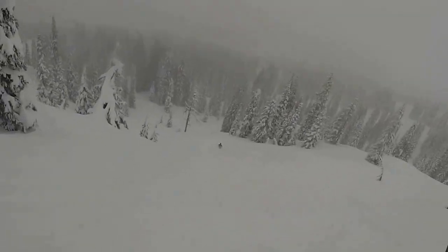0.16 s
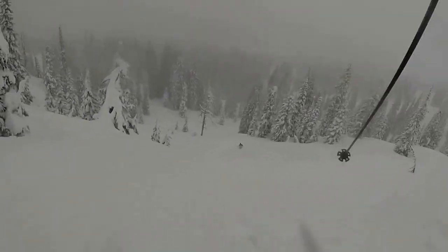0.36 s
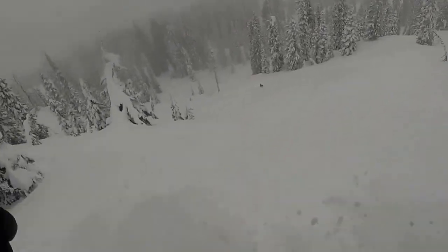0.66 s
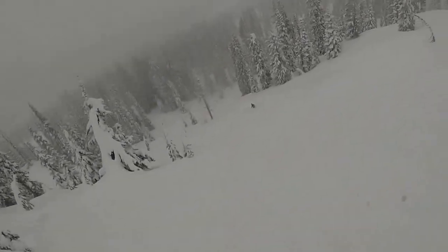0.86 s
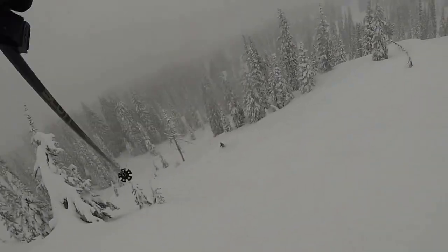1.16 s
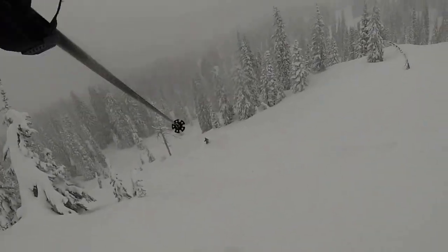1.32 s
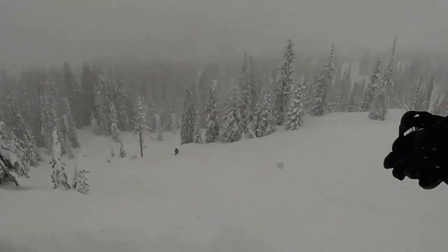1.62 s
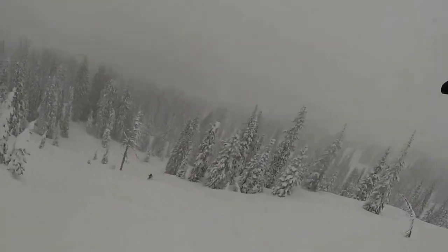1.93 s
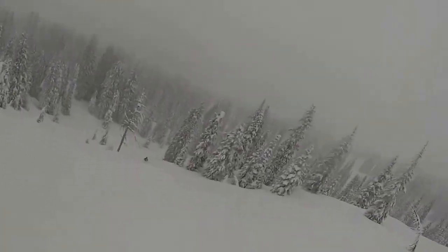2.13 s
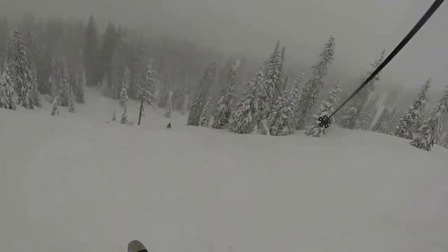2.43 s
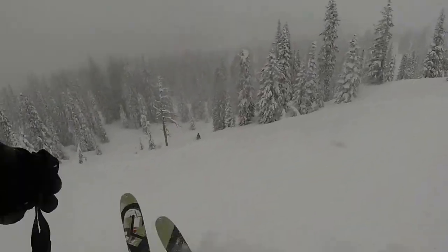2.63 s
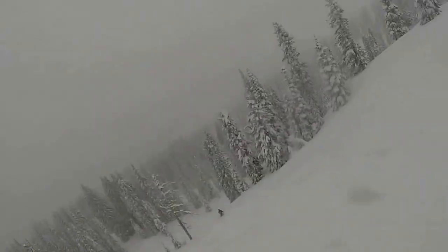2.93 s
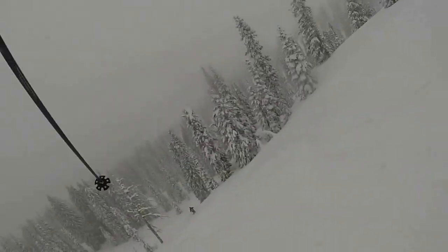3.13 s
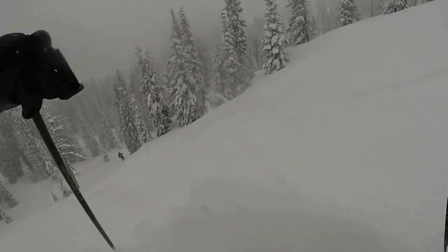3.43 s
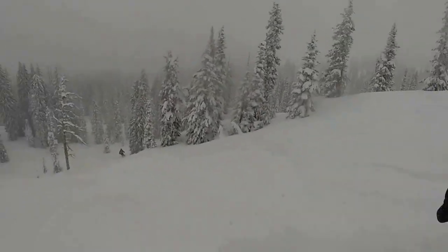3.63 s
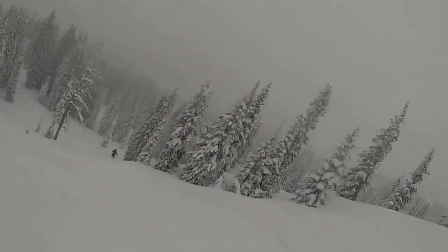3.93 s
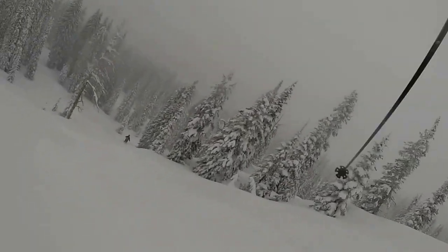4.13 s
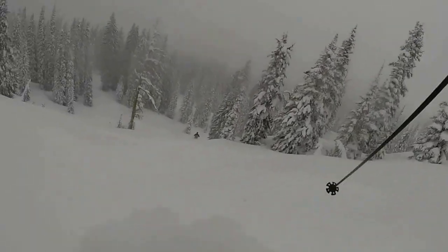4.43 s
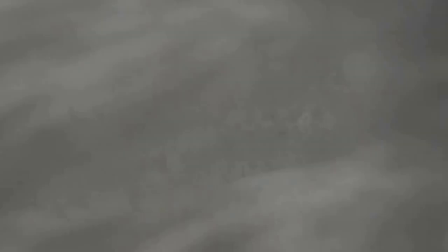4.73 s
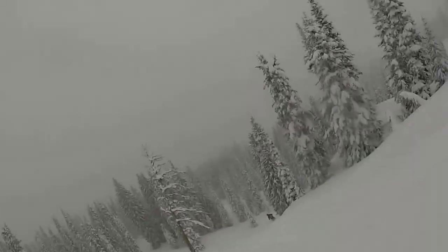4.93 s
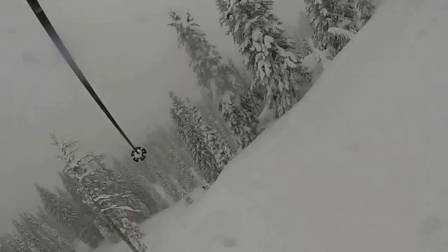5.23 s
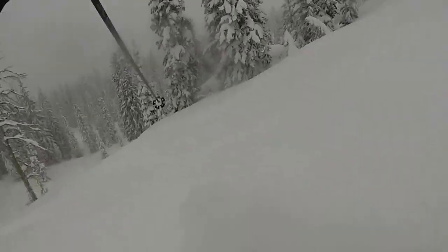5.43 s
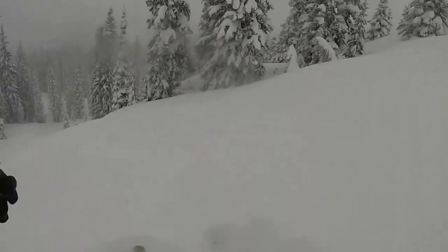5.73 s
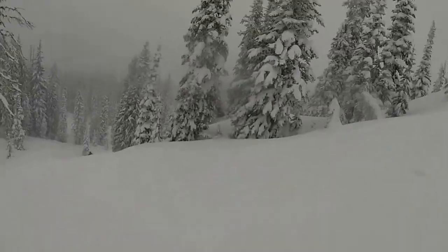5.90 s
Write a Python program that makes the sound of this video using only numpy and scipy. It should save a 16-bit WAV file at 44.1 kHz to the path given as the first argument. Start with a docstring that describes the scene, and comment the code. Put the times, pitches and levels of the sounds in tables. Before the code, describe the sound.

Skis swish through deep powder in linked turns, with wind buffeting, sharp knocks and snow ticking on a body-worn camera.

```python
"""Skis carve linked turns through deep powder, heard from a small action camera worn on the body.
As the load builds through each turn they shear the snow, rumble over it, thud on lumps and crunch it down.
Bursts and clouds of spray hiss across the camera, crumbs tick on its case and soft slabs slap it.
The loose mount knocks against its stop once a turn, snow and clothing scuff, and air buffets the mic."""
import sys
import numpy as np
from scipy import signal
from scipy.fft import rfft, irfft
from scipy.io import wavfile
from scipy.ndimage import uniform_filter1d

SR = 44100
rng = np.random.default_rng(int(sys.argv[2]) if len(sys.argv) > 2 else 0)


def wrap_up_sound(samples):
    """Save the sound to the file named by the first command line argument, as 16-bit audio."""
    columns = np.atleast_2d(samples).T
    # keep every value between -1 and 1, then stretch to whole-number steps
    tamed = np.clip(columns, -1, 1)
    steps = np.round(tamed * 32767).astype(np.int16)
    wavfile.write(sys.argv[1], SR, steps)


N = 267246
TIME = np.arange(N) / SR

# tone of the ski swish, the spray, the ski rumble and the wind, each (frequency [Hz], level [dB])
SWISH_EQ = [(350, -6), (560, -4.5), (800, -5.5), (1300, -4.5), (1700, 3), (2100, -1.5), (2800, -1),
            (3300, -0.5), (4200, -12.5), (5800, -9), (7200, -19), (12000, -56)]
SPRAY_EQ = [(700, -21.5), (1700, -3), (3000, -1), (4200, 1.5), (5400, -2.5), (6400, -3), (7500, -9),
            (8600, -5), (11000, -8), (15000, -14), (16000, -50)]
RUMBLE_EQ = [(56, -40.5), (95, -2), (173, 3.5), (232, -7), (284, -8.5), (414, -10), (586, -19.5),
             (719, -26.5), (800, -26), (1040, -24), (1760, -120)]
WIND_EQ = [(5, -24.5), (12, 1), (24, -9), (36, 4), (50, -27), (75, -13.5), (110, -24), (160, -41.5),
           (300, -89)]
# turns: (end [s], knock peak [dB], swish [dB], spray [dB], rumble [dB], wind [dB], bite [exponent],
# unweighting [s], trim of the float before it [dB]); swish to wind at full load; bite under 1 grips early
TURNS = [(0.0765, 2, -44, -54.5, -32.5, -31, 0.5, 0.017, -4),
         (1.3627, 4.4, -48.5, -62, -40.5, -40, 0.36, 0.097, -7.5),
         (2.3426, 3, -44, -57.5, -37, -36, 0.64, .17, 1.5),
         (3.2716, 1.6, -45, -71.5, -39.5, -29.5, 0.38, 0.031, -5),
         (4.2684, 2, -49, -61, -41, -37, 1, 0.057, -0.5),
         (5.2748, 2, -42.5, -51.5, -36, -37.5, 0.55, 0.15, 0.5),
         (6.0465, 0.96, -49, -65, -39, -38, 0.58, .1, 3)]
# the skis float unweighted between turns: (swish [dB], spray [dB], rumble [dB], wind [dB])
FLOAT_LEVELS = [-53, -71, -55, -45.5]
# sizzle on the spray near 5.5 kHz: (time [s], gain of that band [dB])
SIZZLE_GAIN = [(0, -28), (3.6, -5), (3.9, 8), (4.6, 1), (5.5, -5), (6.06, -10)]
# lumps under the skis: (time [s], level [dB], pitch [Hz], t60 [s])
LUMPS = [(0.012, -20, 174, 0.092), (0.616, -28, 424, 0.032), (2.221, -22, 420, 0.028),
         (2.854, -14, 330, 0.012), (2.963, -11.5, 206, 0.034), (2.99, -15.5, 333, 0.026),
         (3.73, -17.5, 188, 0.043), (3.819, -27, 342, 0.08), (3.952, -25, 362, 0.021),
         (4.953, -14, 424, 0.017), (5.514, -24, 400, 0.039), (5.826, -19, 235, 0.012),
         (5.996, -18.5, 423, 0.013)]
# ring of the camera case: (frequency [Hz], level [dB], t60 [s])
CASE_MODES = [(1860, -17.5, 0.03), (2860, 6, 0.0022), (3420, 1.5, 0.006), (4360, 4.5, 0.004),
              (5075, 8.5, 0.005), (5950, 3.5, 0.004), (7840, 16.5, 0.001), (9350, -5.5, 0.0025),
              (13200, 3.5, 0.0043)]
# hard bits strike the case: (time [s], peak [dB], centre [Hz])
CASE_HITS = [(0.024, -17, 3740), (0.1051, -25, 4230), (0.3755, -26.5, 3730), (0.533, -22, 4160),
             (0.5493, -23, 5140), (0.674, -19.5, 4750), (0.698, -20, 4800), (0.7458, -16.5, 3020),
             (0.767, -18.5, 4700), (0.889, -16.5, 6600), (0.9538, -20.5, 3730), (0.991, -24, 6800),
             (1.151, -24, 4370), (1.183, -16.5, 3430), (1.2706, -22, 5000), (1.2909, -17, 4460),
             (1.3463, -11.5, 4500), (1.501, -20, 3750), (1.555, -23, 4630), (1.734, -18.5, 5560),
             (2.0393, -12.5, 5230), (2.101, -15, 4060), (2.199, -13.5, 4500), (2.5461, -18.5, 4500),
             (2.73, -22, 4540), (2.757, -14, 5340), (2.8534, -3, 3250), (2.854, -3, 2700),
             (2.861, -16.5, 3500), (2.975, 1.5, 5040), (3.078, -18, 5300), (3.1036, -17, 4600),
             (3.1954, -18.5, 5250), (3.58, -17.5, 4400), (3.6545, -17, 4500), (4.0103, -11, 3500),
             (4.342, -22.5, 5330), (4.4712, -23.5, 4700), (4.5785, -17, 4400), (4.662, -18.5, 4520),
             (4.705, -11, 3200), (4.7218, -5.5, 4300), (5.1795, -18, 5100), (5.2385, -12, 4870),
             (5.474, -19, 4700), (5.6042, -16, 2400)]
# loose crumbs pepper the case: (time [s], peak of the softest [dB])
CRUMB_LEVELS = [(0.15, -44), (0.8, -33.5), (1.5, -38), (2.5, -39.5), (3.4, -43), (4.5, -32.5), (5.2, -47),
                (6.0, -34)]
# ring of mount and camera: (frequency [Hz], level [dB], t60 [s])
MOUNT_MODES = [(55.6, -19, 0.056), (163.5, -11, 0.022), (380, -16, 0.012), (612, -19.5, 0.017),
               (1430, -10.5, 0.0054), (1735, -22.5, 0.025), (2450, -8.5, 0.0065), (3670, -8.5, 0.0033),
               (6220, -15.5, 0.0055), (8800, -15, 0.0035), (12000, -6, 0.0046)]
# snow and clothing slip: (time [s], level [dB], centre [Hz], length [s])
SCUFFS = [(0.287, -48, 2200, 0.008), (0.577, -43, 2750, 0.031), (0.618, -38.5, 780, 0.011),
          (0.733, -41.5, 2470, 0.025), (0.909, -32, 2150, 0.0024), (1.077, -44, 2580, 0.0095),
          (1.189, -39, 2740, 0.0085), (1.213, -35.5, 1850, 0.005), (1.624, -37, 2750, 0.0034),
          (2.222, -38, 1510, 0.0063), (2.406, -37.5, 1640, 0.0093), (3.59, -40, 2570, 0.014),
          (3.728, -47, 900, 0.016), (4.445, -43.5, 920, 0.033), (4.729, -25.5, 1200, 0.0061),
          (5.357, -33.5, 2370, 0.005), (5.83, -31, 2070, 0.0032)]
# the skis press into firmer snow: (time [s], hold [s], rumble [dB], crunch [dB])
PRESSES = [(.6, 0.15, -45.5, -66), (1.79, 0.044, -42.5, -50.5), (2.32, 0.092, -47, -50),
           (2.965, 0.045, -29.5, -53), (3.21, 0.021, -35.5, -55), (3.78, 0.12, -47, -48),
           (4.44, 0.043, -49.5, -57), (4.79, 0.087, -34, -40), (5.02, .11, -33.5, -44),
           (5.5, 0.028, -42.5, -52), (5.97, 0.052, -39, -42)]
# gusts on the mic: (time [s], hold [s], level [dB])
GUSTS = [(.615, 0.16, -27), (1.13, .04, -33), (1.79, 0.056, -32.5), (2.43, .02, -32), (2.86, 0.045, -24.5),
         (3.87, .12, -30.5), (4.71, 0.18, -30), (5.95, 0.15, -28)]
# the skis plough soft snow and throw it at the camera: (time [s], hold [s], swish [dB], spray [dB])
BURSTS = [(1.89, 0.037, -38, -36), (2.91, 0.038, -32, -34.5), (3.64, 0.033, -44.5, -44),
          (4.725, 0.052, -29, -29), (4.81, 0.0067, -27.5, -27), (4.858, 0.0046, -34, -38),
          (4.93, 0.015, -34.5, -31.5)]
# fine powder drifts over the camera: (thickest at [s], swell [s], fade [s], spray [dB])
CLOUDS = [(1.999, 0.076, 0.083, -49.5), (2.189, 0.04, 0.092, -49), (3.131, 0.049, 0.077, -45),
          (3.8, 0.19, 0.12, -53.5), (4.08, .11, 0.12, -44.5), (5.199, 0.078, 0.045, -43.5),
          (5.382, 0.08, 0.11, -51), (5.719, 0.067, 0.051, -50)]
# slabs of powder slap the camera: (time [s], peak [dB], pitch [Hz])
SLABS = [(4.826, -17.5, 107), (4.9576, -2, 139)]


def undb(db):
    """Decibels to gain."""
    return 10 ** (np.asarray(db) / 20)


def db_sum(*levels):
    """Level of unrelated sounds heard together."""
    return 10 * np.log10(sum(undb(db) ** 2 for db in levels))


def automation(table):
    """A fader line through (time, value) points, one value per sample."""
    return np.interp(TIME, *np.transpose(table))


def add(track, s, sound):
    """Mix a sound into the track from time s."""
    i = int(s * SR)
    track[i:i + len(sound)] += sound[:N - i]


def walk(rate):
    """Smooth random motion with a spread of 1, quicker at a higher rate."""
    k = max(int(SR / rate), 2)
    x = uniform_filter1d(uniform_filter1d(rng.standard_normal(N), k), k)
    return x / x.std()


def colour(x, spectrum, unity_band_hz):
    """Minimum-phase EQ through (Hz, dB) points, with an rms gain of 1 from the given band alone."""
    f = np.arange(N // 2 + 1) * SR / N
    hz, db = np.transpose(spectrum)
    low, high = unity_band_hz
    gain = undb(np.interp(np.log(f + 1), np.log(hz), db))
    gain = gain / np.sqrt(np.mean(gain ** 2 * (f > low) * (f < high)))
    cepstrum = irfft(np.log(gain), N)
    fold = np.r_[1, np.full(N // 2 - 1, 2), np.zeros(N - N // 2)]
    return irfft(rfft(x) * np.exp(rfft(cepstrum * fold)), N)


def band(x, hz, width_hz):
    """Resonance of gain 1 at its centre."""
    return signal.lfilter(*signal.iirpeak(hz, hz / width_hz, fs=SR), x)


def ring(modes, wave, length_s):
    """Sum of decaying modes."""
    t = np.arange(int(length_s * SR)) / SR
    return sum(undb(db) * wave(2 * np.pi * hz * t) * np.exp(-np.log(1000) * t / t60)
               for hz, db, t60 in modes)


def surges(rows, attack_s, fade_db_per_s):
    """Envelopes in dB, one per level column: each event is fully up at its time, holds and dies away."""
    power = 1e-12
    for s, hold_s, *db in rows:
        rise = np.clip((TIME - s) / attack_s + 1, 0, 1)
        fall = undb(-fade_db_per_s * np.clip(TIME - s - hold_s, 0, 1))
        power = power + np.outer(undb(db), rise * fall) ** 2
    return 10 * np.log10(power)


def carve(first_turn_s=-0.8):
    """Swish, spray, rumble and wind in dB: load builds through a turn and drops as the skier unweights."""
    loaded_db, total_load, trim_db = 0, 0, np.zeros(N)
    start = last_end = first_turn_s
    for end, _, *full_db, bite, unweight_s, float_trim_db in TURNS:
        build = np.clip((TIME - start) / (end - start), 0, 1) ** bite
        load = build * np.clip(1 - (TIME - end) / unweight_s, 0, 1)
        loaded_db = loaded_db + np.outer(full_db, load)
        total_load = total_load + load
        trim_db[TIME > last_end] = float_trim_db
        start, last_end = end + unweight_s, end
    return loaded_db + (1 - total_load) * np.add.outer(FLOAT_LEVELS, trim_db)


def grains(per_s, spread_db, hiss_db):
    """Snow crystals break, mostly small and a few large, over the hiss of the finest; running rms 1."""
    hit = rng.random(N) < per_s / SR
    size = undb(spread_db * np.minimum(rng.exponential(size=N), 5))
    crackle = hit * size * rng.choice([-1, 1], N)
    texture = crackle / crackle.std() + undb(hiss_db) * rng.standard_normal(N)
    return texture / np.sqrt(uniform_filter1d(texture ** 2, size=1800))


def flicker(x, depth_db, rate):
    """Crumbs of every size break: each half octave from 600 Hz up swells and fades on its own."""
    spectrum = rfft(x)
    hz = (np.arange(len(spectrum)) + 1) * SR / N
    half_octaves = np.clip(2 * np.log2(hz / 600), 0, 9)
    out = 0
    for centre in np.unique(np.round(half_octaves)):
        share = np.maximum(1 - np.abs(half_octaves - centre), 0)
        out = out + irfft(spectrum * share, N) * undb(depth_db * walk(rate))
    return out * x.std() / out.std()


def snow(swish_db, spray_db):
    """The skis shear the powder in small collapses; what they throw up patters on the case."""
    collapse = walk(195)
    # thin snow crackles in separate grains, a thick cloud merges into an even hiss
    thickness = undb(spray_db + 56)
    shear = grains(700 * thickness, spread_db=4, hiss_db=-5) * undb(swish_db + 0.51 * collapse)
    patter = grains(1100 * thickness ** 1.4, spread_db=4.5, hiss_db=-4.5)
    patter *= undb(spray_db + 2.1 * collapse)
    swish = colour(shear, SWISH_EQ, (1200, 3500))
    spray = colour(patter, SPRAY_EQ, (7500, 15000))
    sizzle = band(spray, hz=5470, width_hz=580) * undb(automation(SIZZLE_GAIN))
    swish = flicker(swish, depth_db=4.5, rate=310)
    spray = flicker(spray + sizzle, depth_db=2.3, rate=140)
    return swish + undb(-3) * spray


def rumble(level_db):
    """The chatter of the skis comes up through the body as a low, grainy bed."""
    chatter = grains(500, spread_db=4.5, hiss_db=-8) * undb(level_db + 1.8 * walk(31))
    return colour(chatter, RUMBLE_EQ, (110, 600))


def wind(level_db):
    """Eddies push on the mic: an unsteady sub-bass buffet."""
    eddies = colour(rng.standard_normal(N), WIND_EQ, (20, 90))
    return eddies * undb(level_db + 1.7 * walk(16))


def bumps():
    """Lumps under the skis give short, dull thuds with a weaker overtone."""
    out = np.zeros(N)
    for s, db, hz, t60 in LUMPS:
        modes = [(hz, -2, t60), (hz * 2.19, -9, t60 / 2)]
        add(out, s, undb(db) * ring(modes, np.sin, length_s=.1))
    return out


def tick(centre_hz, octaves, push_s=.0003, attack_s=.000058):
    """One strike on the case, peak 1: each lands on another spot and favours the modes near its centre."""
    scatter = rng.standard_normal((len(CASE_MODES), 2))
    modes = []
    for (hz, db, t60), (detune, accent) in zip(CASE_MODES, scatter):
        rolloff_db = 10 * np.log10(1 + (np.log2(hz / centre_hz) / octaves) ** 4)
        modes.append((hz * (1 + 0.017 * detune), db + 0.83 * accent - rolloff_db, t60))
    # the crumb bursts as it lands: a sharp push with a brief, ragged tail
    push = .15 * rng.standard_normal(40) * np.exp(-np.arange(40) / SR / push_s)
    push[0] = 1
    click = np.convolve(ring(modes, np.sin, length_s=.02), push)
    click *= 1 - np.exp(-np.arange(len(click)) / SR / attack_s)  # the case takes a moment to swing up
    return click / np.abs(click).max()


def hard_bits():
    """The larger bits tick on the case one by one."""
    out = np.zeros(N)
    for s, db, centre_hz in CASE_HITS:
        add(out, s, undb(db) * tick(centre_hz, octaves=0.28))
    return out


def crumbs(count=260, spread_db=4, centre_hz=6200):
    """Small loose crumbs land at random all the way down, a few much harder than the rest."""
    out = np.zeros(N)
    softest_db = automation(CRUMB_LEVELS)
    for when, softness, pitch in rng.random((count, 3)):
        i = int(when * N)
        db = softest_db[i] - spread_db * np.log(max(softness, .04))
        hz = centre_hz * 2 ** (2.2 * (pitch - .5))
        add(out, TIME[i], undb(db) * tick(hz, octaves=0.56))
    return out


def mount_knocks(contact_s=.00003):
    """The mount hits the same stop each turn, so the knocks ring alike; the contact rounds their edge."""
    out = np.zeros(N)
    contact = signal.windows.gaussian(13, contact_s * SR)
    for s, db, *_ in TURNS:
        modes = [(hz, mode_db + 0.81 * rng.standard_normal(), t60) for hz, mode_db, t60 in MOUNT_MODES]
        knock = np.convolve(ring(modes, np.cos, length_s=.06), contact)
        add(out, s, -undb(db) * knock / np.abs(knock).max())
    return out


def scuffs():
    """Snow and clothing slip: each scuff is a quick swell of rough noise around one pitch."""
    out = np.zeros(N)
    t = np.arange(4096) / SR
    middle = t[-1] / 2
    for s, db, hz, length_s in SCUFFS:
        noise = rng.standard_normal(len(t))
        rub = band(band(noise, hz, width_hz=hz), hz, width_hz=hz)
        swell = np.exp(-2 * ((t - middle) / length_s) ** 2)
        add(out, s - middle, undb(db) * rub / rub.std() * swell)
    return out


def crunch(level_db, hz=380, width_hz=255):
    """Snow packs under the skis in quick small collapses, heard as a low crunch."""
    collapses = grains(400, spread_db=6, hiss_db=0)
    packing = band(band(collapses, hz, width_hz), hz, width_hz)
    return packing / packing.std() * undb(level_db)


def clouds():
    """Envelope in dB of the drifting powder: each cloud swells and thins out smoothly."""
    power = np.full(N, 1e-12)
    for s, swell_s, fade_s, db in CLOUDS:
        from_peak = (TIME - s) / np.where(TIME < s, swell_s, fade_s)
        power += undb(db) ** 2 * np.exp(-np.minimum(from_peak ** 2, 100))
    return 10 * np.log10(power)


def slabs(width_cycles=0.39):
    """Soft snow hits the mic: one heavy swing of pressure for each slab."""
    out = np.zeros(N)
    for s, db, hz in SLABS:
        cycles = hz * (TIME - s)
        out -= undb(db) * np.cos(2 * np.pi * cycles) * np.exp(-.5 * (cycles / width_cycles) ** 2)
    return out


def scene():
    """The turns drive snow, rumble and wind. The mix is mono, close and dry: powder gives no echo."""
    carve_db, dust_db, chatter_db, air_db = carve()
    press_db, crunch_db = surges(PRESSES, attack_s=0.079, fade_db_per_s=196)
    gust_db = surges(GUSTS, attack_s=0.025, fade_db_per_s=125)[0]
    plough_db, thrown_db = surges(BURSTS, attack_s=0.032, fade_db_per_s=196)
    cloud_db = clouds()
    swish_db = db_sum(carve_db, plough_db, cloud_db + 0.5)
    spray_db = db_sum(dust_db, thrown_db, cloud_db)
    bed = snow(swish_db, spray_db) + rumble(db_sum(chatter_db, press_db)) + wind(db_sum(air_db, gust_db))
    hits = mount_knocks() + hard_bits() + crumbs() + scuffs() + bumps() + slabs()
    return (bed + hits + crunch(crunch_db))[None]


def record(dry, top_hz=15450):
    """The camera clips at full scale and cuts the top end steeply."""
    lowpass = signal.ellip(10, .2, 80, top_hz, fs=SR, output="sos")
    return signal.sosfilt(lowpass, np.clip(dry, -1, 1))


dry = scene()
out = record(dry)
wrap_up_sound(out)
```